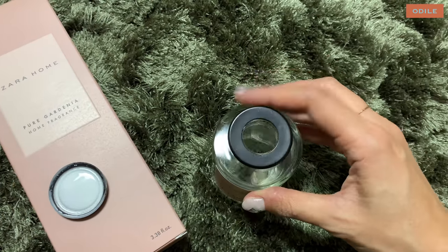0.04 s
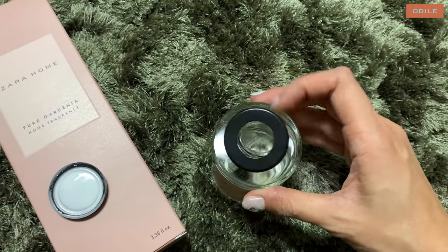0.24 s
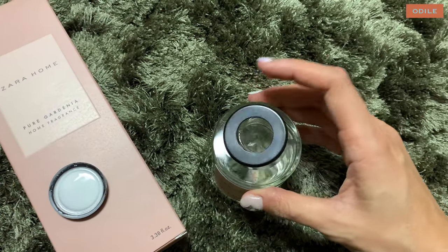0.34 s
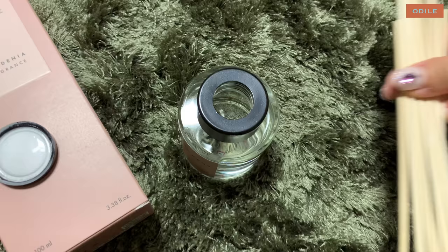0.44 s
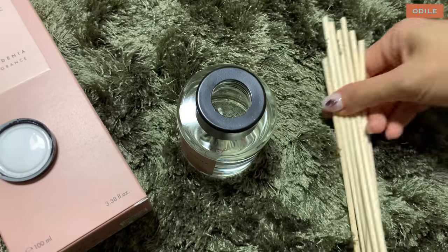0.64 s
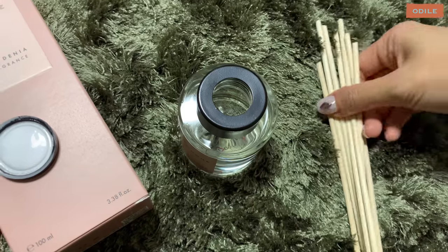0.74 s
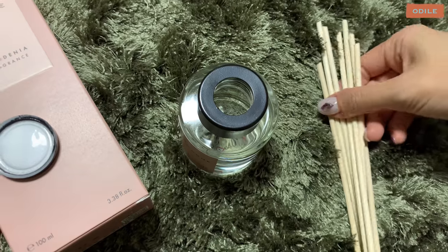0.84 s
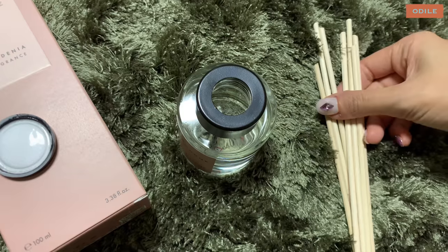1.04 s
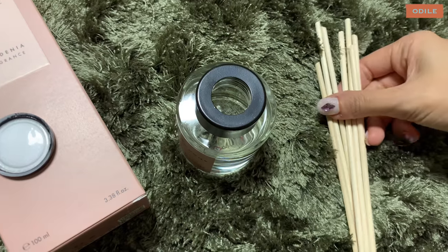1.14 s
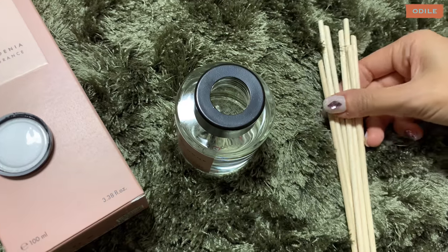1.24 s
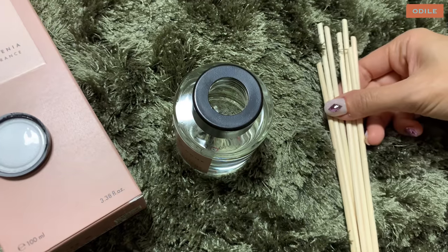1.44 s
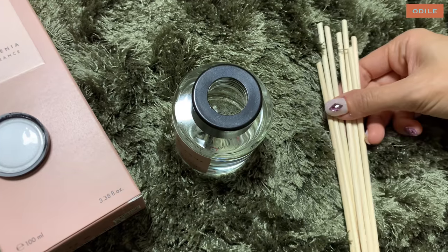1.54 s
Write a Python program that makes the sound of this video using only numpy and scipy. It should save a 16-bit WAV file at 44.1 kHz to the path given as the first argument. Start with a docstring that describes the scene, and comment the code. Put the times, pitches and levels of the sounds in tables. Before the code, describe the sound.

A hard cap clinks against a thick glass bottle, bouncing quickly with a short, high ring. Then thin wooden sticks tick and scrape faintly as they are spread on a rug, close by in a quiet room.

```python
"""A quiet room with a low hum. A hard cap clinks against a thick glass bottle held in the fingers,
bounces a few times and touches once more. Each touch makes the glass ring, and the fingers damp it.
Then a bundle of thin wooden sticks is laid on a rug and spread: the sticks tick as they knock
together, scrape along each other and rustle over the rug."""
import sys
import numpy as np
from scipy import signal
from scipy.fft import rfft, irfft
from scipy.io import wavfile

SR = 44100
rng = np.random.default_rng(int(sys.argv[2]) if len(sys.argv) > 2 else 0)


def wrap_up_sound(samples):
    """Save the sound to the file named by the first command line argument, as 16-bit audio."""
    columns = np.atleast_2d(samples).T
    # keep every value between -1 and 1, then stretch to whole-number steps
    tamed = np.clip(columns, -1, 1)
    steps = np.round(tamed * 32767).astype(np.int16)
    wavfile.write(sys.argv[1], SR, steps)


N = 70560
T = np.arange(N) / SR
HALF_EACH_SIDE = np.array([[.5], [-.5]])   # splits a left-right gap between the two channels


def amp(db):
    return 10 ** (np.asarray(db) / 20)

def rms_one(x):
    return x / np.sqrt(np.mean(x ** 2) + 1e-20)

def curve(rows):
    return np.interp(T, *np.transpose(rows))

def filtered(x, order, hz, keep):
    return signal.sosfilt(signal.butter(order, hz, keep, fs=SR, output="sos"), x)

def fade(t, fade_s):
    """Starts at 1 at t = 0. The fade time is how long it takes to lose 60 dB."""
    return (t >= 0) * amp(-60 * np.maximum(t, 0) / fade_s)

def wobble(per_s):
    """A smooth random wander, about 1 in size."""
    return rms_one(filtered(rng.standard_normal(N + SR // 2), 2, per_s, "low")[SR // 2:])

# Each row: frequency in Hz, how alike left and right are (1 is the same).
LIKENESS = [(30, 0.98), (80, 0.95), (180, 0.8), (350, .6), (700, 0.34), (2000, 0.59), (8000, 0.68),
            (15000, .3)]
def colour(noise, spectrum):
    """Shapes two noises by a spectrum and blends them into left and right."""
    log_hz = np.log(np.maximum(np.fft.rfftfreq(N, 1 / SR), 1))
    def read(rows):
        hz, values = np.transpose(rows)
        return np.interp(log_hz, np.log(hz), values)
    alike = np.clip(read(LIKENESS), 0, 1)
    mid, side = rfft(noise)
    stereo = np.sqrt(1 + alike) * mid + np.sqrt(1 - alike) * side * [[1], [-1]]
    return irfft(amp(read(spectrum)) * stereo, N)

def grains(spectrum, per_s, spread_db):
    """Rubbing is a crowd of tiny clicks of uneven size."""
    sizes = amp(spread_db * np.minimum(rng.exponential(1, N), 5)) * rng.standard_normal((2, N))
    return rms_one(colour(sizes * (rng.random(N) < per_s / SR), spectrum))

ECHO_DB, RING_ECHO_DB = -20, -35.5
def echo(x):
    """The room throws back a short wash of sound, unrelated in left and right."""
    tail = rng.standard_normal((2, SR // 4)) * fade(T[:SR // 4] - .003, fade_s=.31)
    return signal.fftconvolve(x, tail / np.sqrt(np.sum(tail ** 2) / 2), axes=1)[:, :N]

# Tone of the soft background hiss, with a narrow gap near 11.6 kHz.
# Each row: frequency in Hz, relative level in dB.
HISS_TONE = [(24, -36.5), (40, 3), (133, -5.5), (226, -2), (320, -14), (516, -21), (5440, -42),
             (7170, -45.5), (9450, -36), (10700, -34), (11600, -65.5), (12500, -43), (14500, -41),
             (16000, -56.5)]
# How rumble and hum swell. Each row: time in seconds, boost in dB.
SWELL = [(.4, -1.5), (.54, 4.5), (.7, -0.5), (1.2, -0.4), (1.38, 7.5), (1.5, 0.5)]
# The hum's tones. Each row: pitch in Hz, width in Hz, level in dB before the swell.
HUM = [(58.1, 13.54, -81), (122.8, 1.4, -70), (236.2, 5, -76.5)]
def background(hiss_db=-65.5, lumpy_db=5.5):
    """Soft hiss with a rumble that swells and sinks, and a wavering hum."""
    hiss = amp(hiss_db) * rms_one(colour(rng.standard_normal((2, N)), HISS_TONE))
    hiss = filtered(hiss, 4, 46, "high")
    rumble = filtered(hiss, 1, 130, "low")
    out = hiss + rumble * (amp(curve(SWELL) + lumpy_db * wobble(per_s=18)) - 1)
    for hz, width_hz, db in HUM:
        r = np.exp(-np.pi * width_hz / SR)
        resonator = [1, -2 * r * np.cos(2 * np.pi * hz / SR), r * r]
        tone = signal.lfilter([1, 0, -1], resonator, rng.standard_normal(2 * N))
        out += amp(db + curve(SWELL)) * rms_one(tone[N:])
    return out

# Each row: start in seconds, level in dB.
CLICK = [(0.479, -56)]
def dull_click():
    """One faint, dull click."""
    return sum(amp(db) * fade(T - s, fade_s=.0064) for s, db in CLICK)

# How loud the brushing is. Each row: time in seconds, level in dB.
RUSTLE_LEVEL = [(0, -87), (.12, -80.5), (.22, -85), (.5, -90.5), (.63, -91), (.7, -82), (.78, -87),
                (.86, -77), (.93, -83.5), (.968, -63.5), (1., -85), (1.28, -88), (1.305, -70),
                (1.34, -79.5), (1.385, -84.5), (1.45, -105), (1.52, -75), (1.6, -92)]
# Tone of the high rustling hiss, with a narrow gap near 11.7 kHz.
# Each row: frequency in Hz, relative level in dB.
RUSTLE_TONE = [(3000, -13.5), (5000, -11), (6300, -6), (7300, -21), (8300, -2.5), (10000, -5.5),
               (11700, -29.5), (13000, 2), (14800, -2), (15800, -27.5)]
def rug_rustle():
    """Skin and wood brush the rug's pile."""
    return amp(curve(RUSTLE_LEVEL)) * grains(RUSTLE_TONE, per_s=9000, spread_db=2.5)

# How loud the scraping is. Each row: time in seconds, level in dB.
SCRAPE_LEVEL = [(0.664, -102), (0.694, -71), (0.75, -95), (0.908, -76.5), (0.944, -83.5), (0.97, -64.5),
                (1.03, -93), (1.144, -101), (1.17, -66), (1.192, -76.5), (1.215, -80), (1.235, -77),
                (1.28, -102), (1.306, -69.5), (1.47, -109), (1.516, -75.5), (1.588, -105)]
# The scrape's tone. Each row: frequency in Hz, relative level in dB.
SCRAPE_TONE = [(600, -1), (1100, 0.5), (1600, 8), (2000, 4), (2450, 9), (3300, -8.5), (4700, -5),
               (7000, -21.5)]
def stick_scrape():
    """The sticks rub along each other in many tiny slips."""
    level = amp(curve(SCRAPE_LEVEL)) * (T > SCRAPE_LEVEL[0][0])
    return level * grains(SCRAPE_TONE, per_s=6000, spread_db=2.2)

# Each row: start in seconds, level in dB before the low notes are cut.
FLICKS = [(.5537, -60), (.7543, -57), (1.3055, -56), (1.3345, -59), (1.516, -58)]
def stick_flicks():
    """The stick ends flick: tiny crisp clicks, all treble."""
    bursts = sum(amp(db) * fade(T - s, fade_s=.003) for s, db in FLICKS)
    return filtered(bursts * rng.choice([-1, 1], N), 3, 8500, "high")

# Sticks knock together. Each row: start in seconds, level in dB, brightness in dB per octave,
# pitch factor.
TICKS = [(0.6786, -70.5, -1, 0.83), (0.9666, -58, 6, 1.06), (.99, -71, -2, 0.97),
         (1.168, -49.5, 4.5, 1.017), (1.236, -66, 4, 0.74), (1.304, -61, -3, .98), (1.309, -61, -2, 1.0),
         (1.3365, -58, 7, 1.01), (1.352, -67.5, -1, .97), (1.516, -70.5, -2, 1.1)]
# The wood's notes. Each row: base pitch in Hz, relative level in dB, fade time in seconds.
WOOD_NOTES = [(1320, -20, 0.033), (2314, -24, 0.079), (2411, -1.5, 0.041), (3430, -9.5, 0.0099),
              (4750, -13.5, 0.014), (7850, -19, 0.022), (9900, -23, 0.021), (12400, -30, 0.0076)]
def stick_ticks(snap_db=-24, spread_db=1.5):
    """Each knock is a dry snap that rings the wood's notes, never quite the same way twice."""
    chances = rng.standard_normal((len(TICKS), len(WOOD_NOTES), 2))
    hiss = np.diff(rng.standard_normal(N + 1))
    wood = np.zeros(N)
    for (s, db, bright_db, pitch), draws in zip(TICKS, chances):
        age = T - s
        wood += amp(db + snap_db + bright_db) * fade(age, fade_s=.003) * hiss
        for (base_hz, note_db, fade_s), (level_draw, pitch_draw) in zip(WOOD_NOTES, draws):
            hz = base_hz * pitch * (1 + .01 * pitch_draw)
            tilt_db = bright_db * np.log2(hz / 4000)
            level = amp(db + note_db + tilt_db + spread_db * level_draw)
            wood += level * fade(age, fade_s) * np.sin(2 * np.pi * hz * age)
    stereo = np.stack([wood, wood])
    return stereo + amp(ECHO_DB) * echo(stereo)

CHATTER_DB, CHATTER_PER_S = .8, 120   # the loose cap makes the rings waver
# How loud the scuffing is. Each row: time in seconds, level in dB.
SCUFF_LEVEL = [(.2, -93), (.211, -75.5), (.216, -52), (.247, -75.5), (.256, -54.5), (.272, -57.5),
               (.29, -65.5), (.315, -86)]
# The scuff's tone. Each row: frequency in Hz, relative level in dB.
SCUFF_TONE = [(300, -15.5), (900, -9.5), (2100, 0.5), (3600, -5), (4800, -1.5), (6100, -3.5), (8000, -23)]
# How loud the high shimmer is. Each row: time in seconds, level in dB.
SHIMMER_LEVEL = [(.25, -83.5), (.256, -56), (.279, -43.5), (.3, -58), (.33, -85)]
def cap_scuff(shimmer_hz=(11050, 11730), waver_db=4, lead_rad=-2.7):
    """The cap slides on the glass between touches: rough grains and two high, wavering tones."""
    shimmer = sum(amp(waver_db * wobble(CHATTER_PER_S))
                  * np.sin(2 * np.pi * hz * T + lead_rad * HALF_EACH_SIDE) for hz in shimmer_hz)
    rough = amp(curve(SCUFF_LEVEL)) * grains(SCUFF_TONE, per_s=2200, spread_db=3.5)
    sliding = (T > SCUFF_LEVEL[0][0]) * (T < SHIMMER_LEVEL[-1][0])
    return sliding * (rough + amp(curve(SHIMMER_LEVEL)) * shimmer)

# The cap hits the glass. Each row: start in seconds, then levels in dB for the dull knock,
# main ring, upper rings, crack and free ring.
TOUCHES = [(0.2145, -58, -43, -70, -50, -93), (0.2328, -27, -2, -11, -19.5, -50),
           (0.2526, -42, -9, -30, -35, -60), (.2612, -43, -30, -42, -40, -91),
           (0.2787, -42.5, -56, -67.5, -52, -78), (0.2888, -46, -74, -75, -45, -78.5),
           (0.3669, -44.5, -66, -43, -45, -47)]
def rings(notes, column, rise_s, clock=T):
    """Every touch tops up each note of bottle and cap; a faster clock makes the notes die sooner."""
    out = np.zeros((2, N))
    for hz, db, fade_s, pan_db, lead_rad in notes:
        level = np.zeros(N)
        for touch in TOUCHES:
            rise = 1 - np.exp(-np.maximum(T - touch[0], 0) / rise_s)
            age = clock - np.interp(touch[0], T, clock)
            level += amp(touch[column] + db) * rise * fade(age, fade_s)
        level *= amp(CHATTER_DB * wobble(CHATTER_PER_S))
        phase = 2 * np.pi * (hz * T + rng.random()) + lead_rad * HALF_EACH_SIDE
        out += level * amp(pan_db * HALF_EACH_SIDE) * np.sin(phase)
    return out

# The crack's tone. Each row: frequency in Hz, boost in dB.
CRACK_TONE = [(1000, -29), (1900, -1), (3500, -1), (4700, 7.5), (6000, -4), (8000, -14.5), (13000, -22)]
def cap_crack(right_lag_s=.00011):
    """Each touch gives a short burst of noise, heard a hair later on the right."""
    bursts = sum(amp(touch[4]) * fade(T - touch[0], fade_s=.0068) for touch in TOUCHES)
    left = colour(bursts * rng.standard_normal((2, N)), CRACK_TONE)[0]
    delay = np.exp(-2j * np.pi * np.fft.rfftfreq(N, 1 / SR) * right_lag_s)
    return np.stack([left, irfft(rfft(left) * delay, N)])

# Four sets of notes of bottle and cap. Each row: pitch in Hz, relative level in dB, fade time in
# seconds before any grip, how much louder the left is in dB, how far the left leads in radians.
KNOCK_NOTES = [(1485.3, 5, 0.018, 9, 0.29), (1280, -13, 0.047, 4.5, 0.96), (1468, -19, 0.14, -2, 0.716),
               (2870, -11.5, 0.015, -7, 0.92)]
MAIN_NOTES = [(7712, 0, .22, -.5, 2.15), (7500, -24, .05, 0, 2.1), (15060, -32, .17, 0, -1.7)]
UPPER_NOTES = [(8950, -9, .1, 0, .3), (8940, -2, .025, 0, .55), (9170, -16, .1, 0, .3),
               (8750, -10, .02, 0, .5), (4750, -20, .03, -5, -1.2), (5900, -26, .025, 0, 2.8),
               (12500, -1, .004, 0, 2.3), (9600, -3, .012, 0, .3), (14800, -12, .004, 0, -1.7)]
FREE_NOTES = [(7628, 0, .19, -1, 2.3)]
# Fingers on the glass. Each row: time in seconds, how many times faster the main ring fades.
GRIP = [(.2, 4.2), (.265, 2.6), (.29, 4.5), (.31, 6), (.33, 1.5)]
def bottle_clinks():
    """The cap makes the bottle knock and ring; the fingers damp only the main ring."""
    grip_clock = np.cumsum(curve(GRIP)) / SR
    glass = rings(MAIN_NOTES, column=2, rise_s=.0009, clock=grip_clock)
    glass += rings(UPPER_NOTES, column=3, rise_s=.0003)
    glass += rings(FREE_NOTES, column=5, rise_s=.001)
    knock = cap_crack() + rings(KNOCK_NOTES, column=1, rise_s=.0008)
    knock = filtered(knock, 3, 900, "high")
    return glass + knock + echo(amp(ECHO_DB) * knock + amp(RING_ECHO_DB) * glass)

def scene():
    bottle = bottle_clinks() + cap_scuff()
    sticks = stick_ticks() + stick_flicks() + rug_rustle() + stick_scrape()
    return bottle + sticks + background() + dull_click()

def record(dry):
    """Cuts away the very highest treble."""
    return signal.sosfilt(signal.cheby2(12, 80, 16650, fs=SR, output="sos"), dry)


dry = scene()
out = record(dry)
wrap_up_sound(out)
```